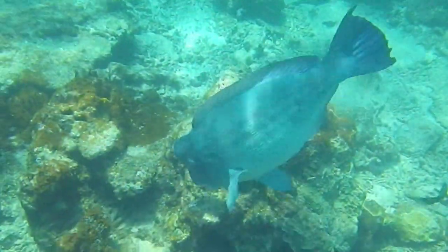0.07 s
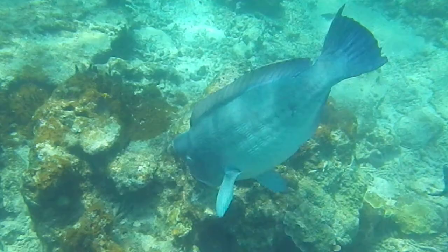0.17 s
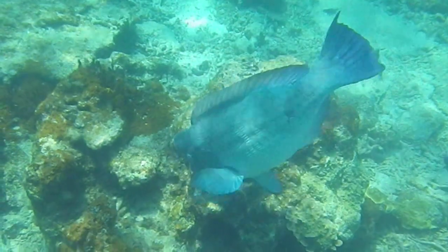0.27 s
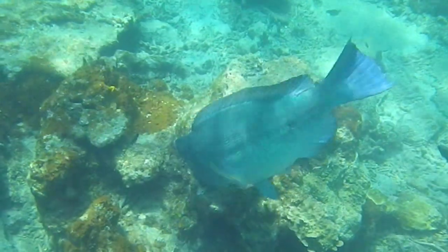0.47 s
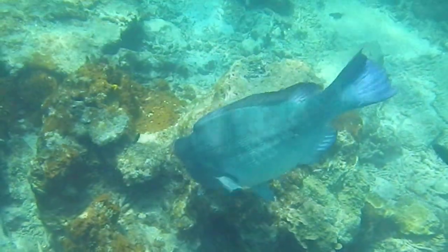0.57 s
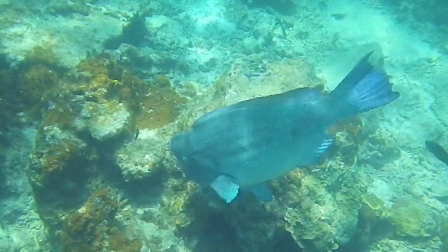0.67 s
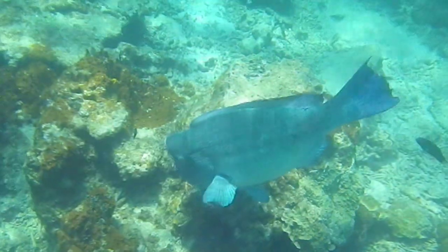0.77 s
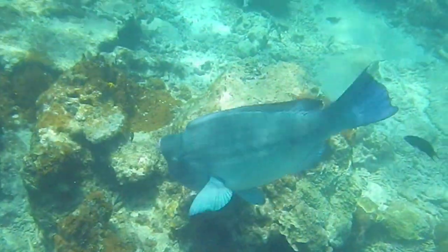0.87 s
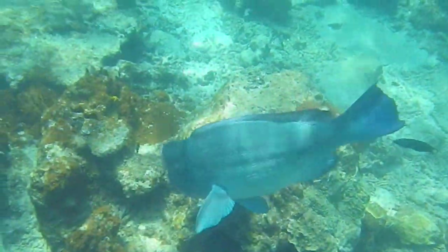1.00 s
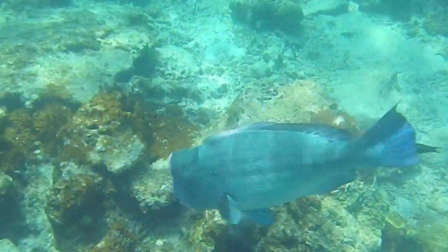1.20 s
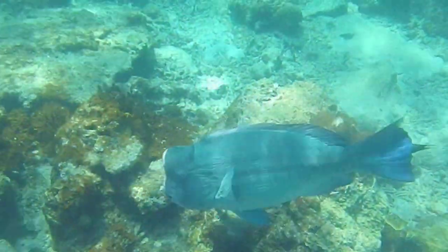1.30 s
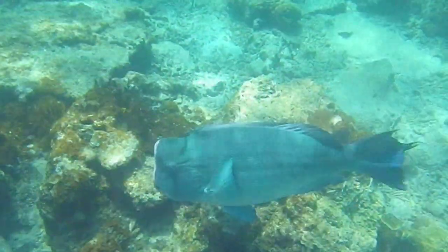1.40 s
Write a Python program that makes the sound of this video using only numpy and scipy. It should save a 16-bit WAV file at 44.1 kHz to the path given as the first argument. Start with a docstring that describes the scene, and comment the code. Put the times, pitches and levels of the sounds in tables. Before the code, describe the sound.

Underwater, a parrotfish bites coral with a short hollow crunch while shrimp click around it.

```python
"""A large parrotfish bites hard coral under water: a knock of the beak, a short crunch, single cracks.
Blows and fractures ring the modes of the watertight camera housing; loose crumbs rattle briefly.
Near shrimp snap as resonant clicks, distant ones merge into a crackle on the reef.
Moving water rumbles and bumps against the housing."""
import sys
import numpy as np
from scipy import signal
from scipy.fft import rfft, irfft
from scipy.io import wavfile

SR = 44100
rng = np.random.default_rng(int(sys.argv[2]) if len(sys.argv) > 2 else 0)


def store_wav(level_fs):
    """Save 16-bit WAV to argv[1]."""
    pcm = np.round(np.clip(np.atleast_2d(level_fs), -1, 1) * 32767)
    wavfile.write(sys.argv[1], SR, pcm.T.astype(np.int16))


N = 63945

# housing resonances: f/Hz, t60/s, rise/s
HOUSING_MODES = [(320.8, 0.044, 0.006), (352.5, 0.023, 0.0016), (713.6, .028, 0.0031), (740, 0.019, 0.0054),
                 (1369, 0.049, 0.001), (1774, 0.018, 0.00067)]
TOP_HZ = 15850


def knocks(low_pair_db=-3, mid_pair_db=-7):
    """Beak knocks and bumps ring the housing, each with its own mode weights."""
    # t/s, level/dB of modes 1-2, 3-4, 5 and 6, t60 factor, pitch factor
    blows = [(.2283, -40, -16.5, -27, -39, 2, 1.06), (0.2352, -9, 2.5, -19, -6.5, 1.18, 1.006),
             (.4055, -58, -19.5, -54, -56, 1.5, 1.015), (0.4935, 2, 5.5, -19.5, -8.5, 0.71, 0.968),
             (0.5081, -11.5, -62, -38, -25.5, .9, 1.01), (0.9081, -13, -5.5, -32, -21, 0.7, 1.044),
             (1.1611, -16.5, 2, -36, -2.5, 0.54, 1.025), (1.1877, -52, -32, -15.5, -11.5, 0.79, 0.94)]
    out = np.zeros(N)
    for start_s, low, mid, fifth, sixth, t60_factor, pitch in blows:
        modes_db = [low, low + low_pair_db, mid, mid + mid_pair_db, fifth, sixth]
        add(out, start_s, housing(modes_db, t60_factor, pitch))
    return out


def crunch(grit_db=-20, crack_decay_s=0.0022):
    """Coral gives way: a run of fractures, a spray of grit, a low thud."""
    # t/s, ring level/dB, crack level/dB, pitch factor
    fractures = [(.2578, -6, -24, 1.11), (.2645, -34, -19, 0.9), (.2692, -24, -16.5, 1.5),
                 (.2715, -6.5, -21, 1.04), (.279, 0, -21, 0.98), (.2855, 3, -18.5, 1.09),
                 (.298, -26, -22.5, 1.3), (.3028, -1.5, -30, 1.23), (.3075, -4, -22, 1.05),
                 (.3155, 0, -18, 0.98), (.3228, -2, -38, 1), (.339, -12, -54, 1.02), (.35, -18, -29, 1.04)]
    # spectra: f/Hz, level/dB
    grit_spectrum = [(200, -30), (300, -32), (400, -26), (520, -23), (620, -8.5), (700, 7), (800, -3.5),
                     (900, -2), (970, -14), (1050, 1), (1140, -42), (1300, -5.5), (1800, -13.5),
                     (2280, -18), (2700, -21.5), (3500, -22), (4500, -32), (7200, -43), (7900, -59),
                     (8600, -43), (12000, -58), (15500, -75)]
    crack_spectrum = [(700, -13), (1000, -3), (1130, -7.5), (1300, 4), (1900, -6), (2300, -7), (2700, -2),
                      (3600, -3), (4400, -15.5), (7000, -25.5), (7900, -33), (8700, -28.5), (15000, -44)]
    thud_spectrum = [(25, -18), (55, 0), (85, 2), (160, 4.5), (280, -2), (400, -2.5), (520, -32.5)]
    # envelopes: t/s, level/dB
    bite_force = [(.245, -27), (.254, -1.5), (.26, 5), (.275, -1), (.287, 8), (.299, 7), (.318, 6.5),
                  (.326, 3.5), (.335, -8), (.36, -23), (.375, -34)]
    thud_envelope = [(.18, -78), (.235, -31), (.26, -25.5), (.275, -21), (.295, -21), (.317, -20),
                     (.33, -32), (.345, -41), (.4, -80)]
    t = np.arange(N) / SR
    out = colour(grains(per_s=2200, spread_db=0.5), grit_spectrum) * curve(bite_force) * undb(grit_db)
    splinters = colour(rng.standard_normal(N), crack_spectrum)
    for start_s, ring_db, crack_db, pitch in fractures:
        ring = housing(modes_db=[-19, -19, 0, -6, -24, -20], t60_factor=0.99, pitch=pitch)
        add(out, start_s, undb(ring_db) * ring)
        out += undb(crack_db) * splinters * (t >= start_s) * np.exp(-np.abs(t - start_s) / crack_decay_s)
    return out + colour(rng.standard_normal(N), thud_spectrum) * curve(thud_envelope)


def snaps(tail_s=0.0023, tail_db=-15.5, tick_db=-17, ring_db=-24.5, skirt_db=-25, edge_db=-20):
    """Breaking coral and near shrimp: resonant clicks, briefly scattered by the reef, ring the housing."""
    # t/s, click peak/dB, centre f/Hz, width/octaves, top edge f/Hz
    clicks = [(0.027, -27, 2630, 2.1, 5170), (0.1161, -17.5, 2920, 2.4, 5550),
              (0.147, -19.5, 2170, 0.76, 5000), (0.351, -33, 2300, 1.2, 8000), (0.36, -27, 1680, 1.2, 6500),
              (.3842, -19.5, 1850, 1.16, 6850), (0.4752, -22.5, 2580, 1.6, 5540),
              (.495, -25, 4970, 0.98, 15300), (0.5128, -24.5, 3540, 1.2, 6000),
              (0.514, -23.5, 2260, 2.1, 5100), (0.5833, -22, 1710, 0.71, 7200),
              (0.6799, -20.5, 3200, 0.94, 4600), (0.7778, -18, 2850, 1.5, 5000),
              (0.8112, -23.5, 3280, 0.73, 13900), (0.8397, -13, 2240, 2.5, 6230),
              (0.8901, -13.5, 3030, 0.43, 9700), (1.0866, -16.5, 3330, 3.8, 7600),
              (1.115, -22, 5860, 1.2, 7260), (1.162, -5, 2040, 1.3, 5420), (1.18, -34.5, 6000, 1, 11000),
              (1.279, -13, 3060, 1.6, 6200), (1.2952, -20, 4100, 0.51, 9200),
              (1.304, -20.5, 1680, 0.61, 4460), (1.361, -23.5, 2830, 0.78, 4220),
              (1.412, -14, 2370, 2.5, 4700)]
    size = 1024
    out, t = np.zeros(N), np.arange(size) / SR
    for start_s, peak_db, centre_hz, octaves, edge_hz in clicks:
        def spectrum_db(hz):
            resonance = skirt_db * (1 - 1 / (1 + (np.log2(hz / centre_hz) / octaves) ** 2))
            top_shelf = edge_db / (1 + (edge_hz / hz) ** 14)
            low_cut = -10 * np.log10(1 + (900 / hz) ** 4)
            return resonance + top_shelf + low_cut

        pulse = undb(tail_db) * rng.standard_normal(size) * np.exp(-t / tail_s)
        pulse[0] = 1  # direct arrival
        click = signal.fftconvolve(pulse, response(spectrum_db))[:size]
        bright_tick = edge_hz / TOP_HZ * np.array([1, -2, 1])
        add(out, start_s, undb(peak_db) * click / np.abs(click).max())
        add(out, start_s, undb(peak_db + tick_db) * bright_tick)
        add(out, start_s, undb(peak_db + ring_db) * housing(np.zeros(len(HOUSING_MODES))))
    return out


def housing(modes_db, t60_factor=1, pitch=1, low_cut_hz=216):
    """Housing modes after one blow: each swells briefly, then decays."""
    t = np.arange(N // 6) / SR
    ring = np.zeros(len(t))
    for db, (hz, t60_s, rise_s) in zip(modes_db, HOUSING_MODES):
        envelope = (1 - np.exp(-t / rise_s)) * np.exp(-np.log(1000) * t / (t60_s * t60_factor))
        ring += undb(db) * np.sin(2 * np.pi * hz * pitch * t) * envelope
    return signal.sosfilt(signal.butter(4, low_cut_hz, "high", fs=SR, output="sos"), ring)


def crumbs():
    """Loose bits rattle after the last big crack."""
    # rattle: f/Hz, level/dB
    spectrum = [(900, -30), (1150, -17), (1370, 10), (1480, -7), (1600, -2), (1850, -7), (2200, -31),
                (3300, -21), (5000, -34.5)]
    # rattle: t/s, level/dB
    envelope = [(1.155, -77), (1.17, -26.5), (1.183, -37), (1.192, -27), (1.203, -25), (1.22, -38),
                (1.25, -69), (1.3, -80)]
    return colour(grains(per_s=1500, spread_db=1.3), spectrum) * curve(envelope)


def distant_shrimp(smear_s=0.0017, crackle_db=-36.5, hum_db=-48):
    """Far snaps, smeared on their way, merge into a crackle that stirs one housing mode."""
    # crackle: f/Hz, level/dB
    spectrum = [(450, -37), (530, -14), (620, 1.5), (715, 6.5), (830, 0.5), (980, -10), (1150, -10.5),
                (1350, 4), (1600, 1), (1900, 0.5), (2250, -8), (2900, -3.5), (3700, -5.5), (4300, -12),
                (5000, -13), (6200, -22), (7400, -24), (7850, -25), (8400, -21.5), (12000, -29.5),
                (15500, -29)]
    # crackle and hum: t/s, level/dB
    envelope = [(0, 0.5), (.13, 1), (.2, -0.5), (.45, -2.5), (.54, -3.5), (.66, -2.5), (.93, -2),
                (1.06, 3.5), (1.13, -0.5), (1.22, 2.5), (1.38, -0.5), (1.45, 1.5)]
    clicks = grains(per_s=5000, spread_db=3.5)
    energy = signal.lfilter([1], [1, -np.exp(-2 / (smear_s * SR))], clicks ** 2)
    crackle = colour(np.sqrt(energy) * rng.standard_normal(N), spectrum)
    hum = unit(signal.lfilter(*signal.iirpeak(HOUSING_MODES[2][0], Q=16, fs=SR), crackle))
    return (undb(crackle_db) * crackle + undb(hum_db) * hum) * curve(envelope)


def water():
    """Moving water: deep rumble, hollow wash on the housing."""
    # spectra: f/Hz, level/dB
    rumble_spectrum = [(22, -1), (45, 0), (65, -4.5), (100, -4.5), (140, -2), (190, -13.5)]
    wash_spectrum = [(120, -18.5), (175, -6.5), (215, -5.5), (262, 0), (300, -1.5), (330, -10), (372, -4.5),
                     (420, -17.5), (520, -16)]
    # envelopes: t/s, level/dB
    rumble_envelope = [(0, -44), (.14, -46.5), (.22, -52), (.45, -52), (.66, -50.5), (.78, -44.5),
                       (.95, -46.5), (1.06, -35), (1.2, -38.5), (1.3, -44.5), (1.38, -51), (1.45, -44)]
    wash_envelope = [(0, -43.5), (.06, -38), (.14, -36.5), (.21, -48), (.4, -42.5), (.53, -51),
                     (.66, -40.5), (.78, -38), (.97, -37.5), (1.08, -38), (1.22, -34.5), (1.31, -39.5),
                     (1.38, -45.5), (1.45, -45.5)]
    rumble = colour(rng.standard_normal(N), rumble_spectrum) * curve(rumble_envelope)
    wash = colour(rng.standard_normal(N), wash_spectrum) * curve(wash_envelope)
    return rumble + wash


def water_bumps(hz=42, half_width_s=0.013):
    """Water pushes softly on the housing, a cycle or two each time."""
    # t/s, level/dB
    pushes = [(0.037, -47), (0.191, -35.5), (1.185, -42)]
    t = np.arange(N) / SR
    return sum(undb(db) * np.sin(2 * np.pi * hz * (t - at_s)) * np.exp(-((t - at_s) / half_width_s) ** 2)
               for at_s, db in pushes)


def grains(per_s, spread_db):
    """Random clicks, many weak, few strong."""
    chance, size, sign = rng.random(N), rng.exponential(size=N), rng.choice([-1, 1], N)
    return (chance < per_s / SR) * sign * undb(spread_db * np.minimum(size, 5))


def colour(x, spectrum):
    """Filter by (f/Hz, level/dB) rows, steep beyond both ends; rms 1."""
    hz, db = np.array(spectrum, float).T
    hz, db = np.r_[hz[0] / 2, hz, hz[-1] * 2], np.r_[db[0] - 30, db, db[-1] - 60]
    impulse = response(lambda f: np.interp(np.log(f), np.log(hz), db))
    return unit(signal.fftconvolve(x, impulse)[:N])


def response(db_at, size=4096):
    """Minimum-phase impulse response with gain db_at(f/Hz)."""
    hz = np.maximum(np.arange(size // 2 + 1) * SR / size, 1)
    cepstrum = irfft(db_at(hz) * np.log(10) / 20)
    cepstrum[1:size // 2] *= 2
    cepstrum[size // 2 + 1:] = 0
    return irfft(np.exp(rfft(cepstrum)))


def curve(rows):
    """Gain over time from (t/s, level/dB) rows."""
    return undb(np.interp(np.arange(N) / SR, *np.array(rows).T))


def undb(db):
    """dB to gain."""
    return 10 ** (np.asarray(db) / 20)


def unit(x):
    """Scale to rms 1."""
    return x / np.sqrt(np.mean(x ** 2))


def add(out, start_s, x):
    """Mix x into out."""
    i = max(int(start_s * SR), 0)
    out[i:i + len(x)] += x[:max(N - i, 0)]


def scene():
    """Feeding fish over shrimp and water; mono."""
    return (knocks() + snaps() + crunch() + crumbs() + distant_shrimp() + water() + water_bumps())[None]


def record(dry):
    """The housing notches two bands; the camera rounds the peaks and cuts the top."""
    # housing stop bands: f/Hz, width/Hz
    notches = [(522, 80), (7880, 270)]
    for hz, width_hz in notches:
        dry = signal.lfilter(*signal.iirnotch(hz, hz / width_hz, fs=SR), dry)
    return signal.sosfilt(signal.ellip(8, .2, 70, TOP_HZ, fs=SR, output="sos"), np.tanh(dry))


dry = scene()
out = record(dry)
store_wav(out)
```